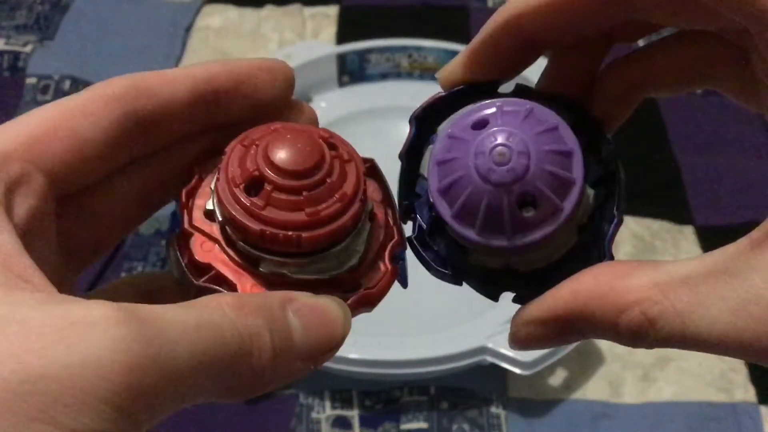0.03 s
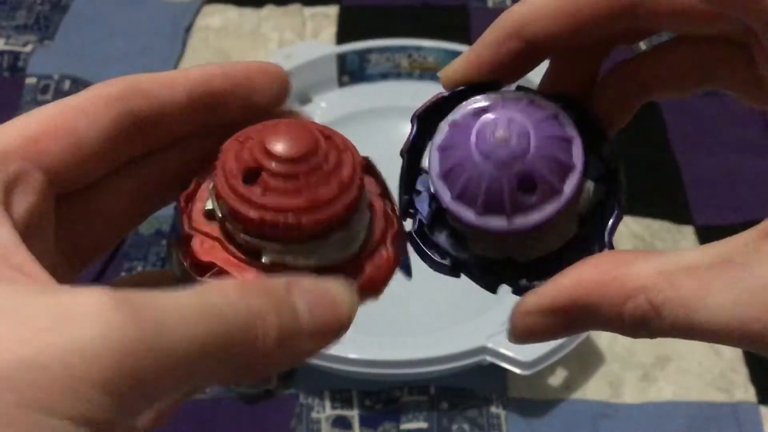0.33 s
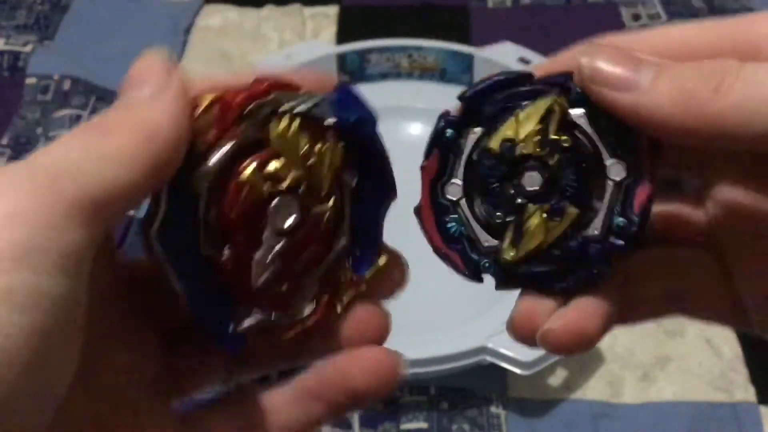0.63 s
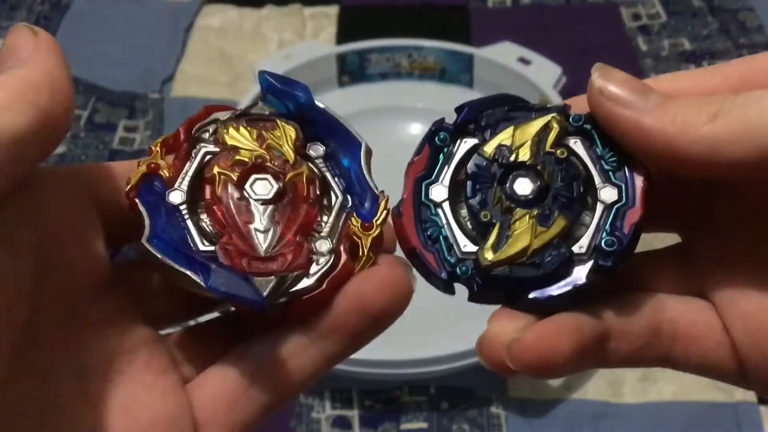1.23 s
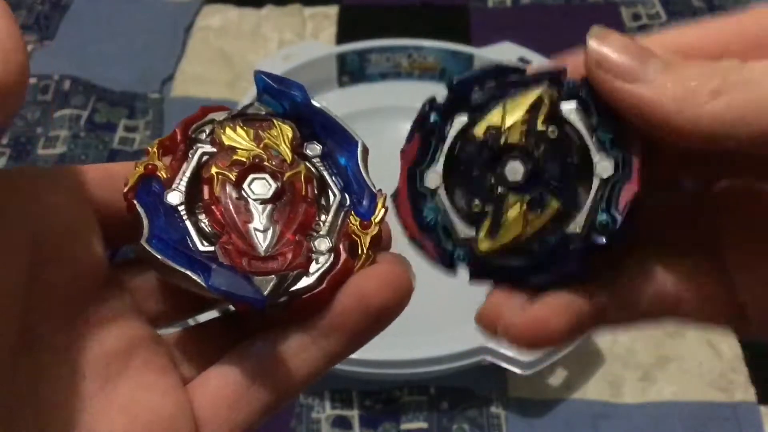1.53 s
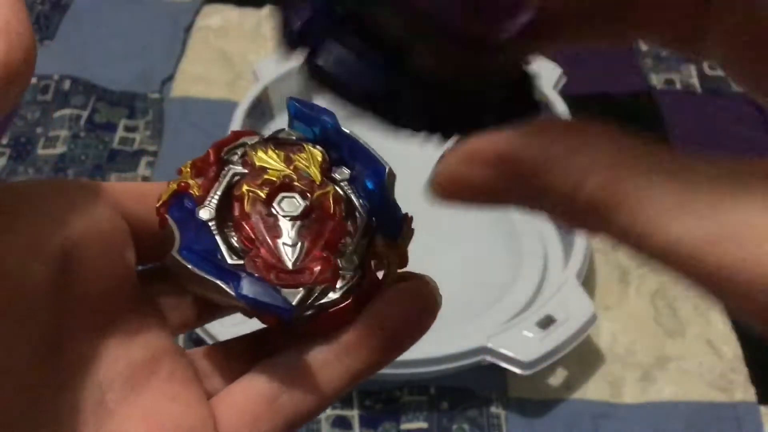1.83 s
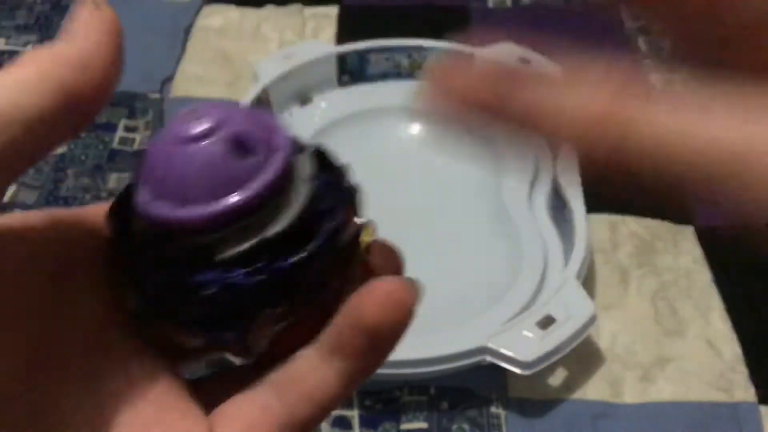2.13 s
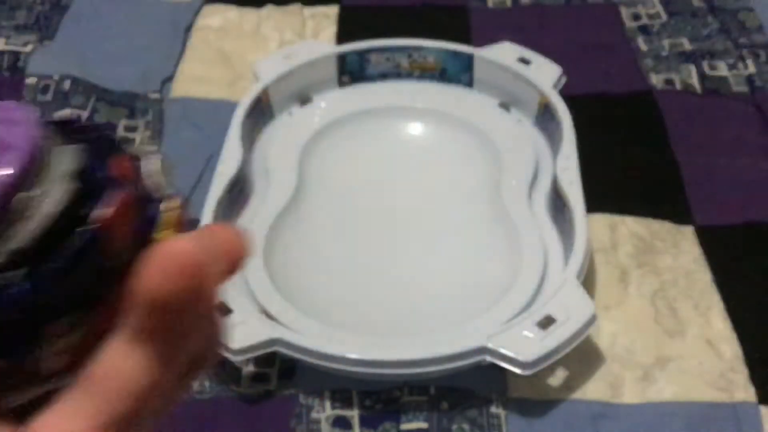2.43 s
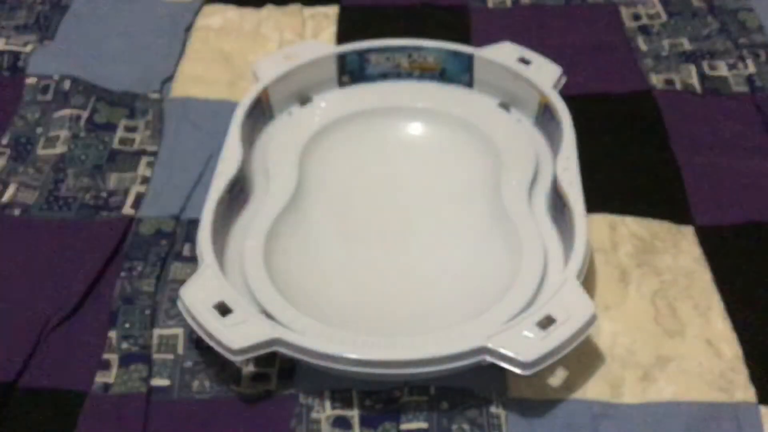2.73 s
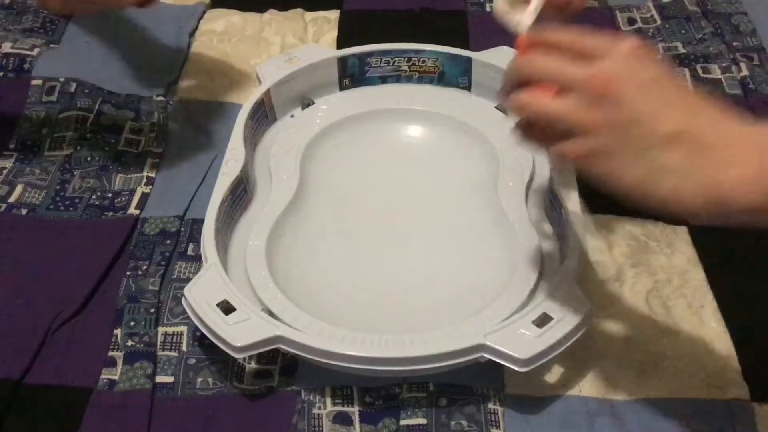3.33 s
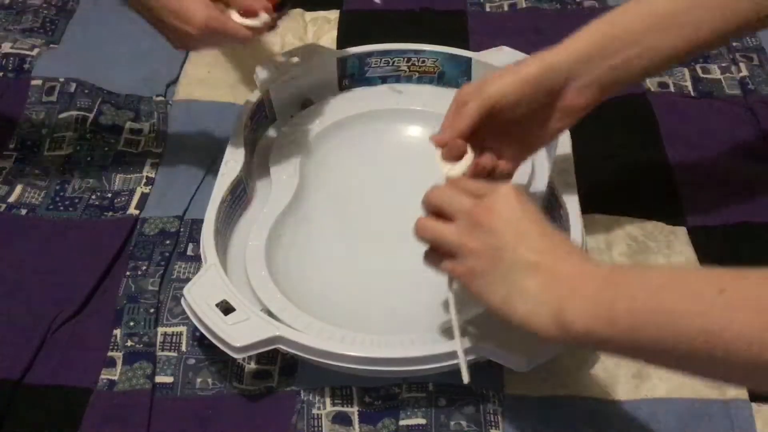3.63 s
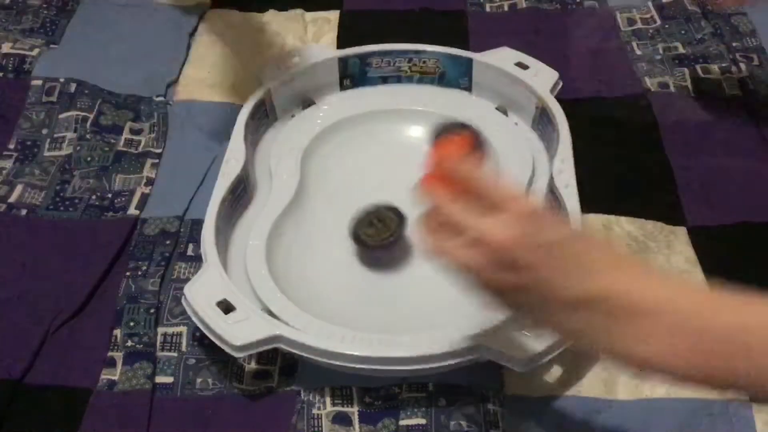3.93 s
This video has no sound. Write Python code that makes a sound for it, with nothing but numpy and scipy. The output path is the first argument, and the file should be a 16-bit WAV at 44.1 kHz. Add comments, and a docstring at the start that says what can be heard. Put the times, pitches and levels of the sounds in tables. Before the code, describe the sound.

A ratcheting ripcord zip launches a spinning top into a plastic arena, after light handling clicks.

```python
"""Light clicks come first, as two plastic and metal spinning tops are turned over in the hands.
The tops knock together once, and a metal disc inside gives a thin ring. A ripcord is pulled through
a launcher: a few slow ratchet teeth, then a fast zip that runs down. The hands jerk apart with dull
thumps, and a top lands in a hollow plastic arena. It all happens in a small furnished room."""
import sys
import numpy as np
from scipy import signal
from scipy.fft import rfft, irfft
from scipy.io import wavfile

SR = 44100
rng = np.random.default_rng(int(sys.argv[2]) if len(sys.argv) > 2 else 0)


def wav_out(sig):
    """Save sig, one row per channel (or a flat mono array), as 16-bit PCM at SR to the path in sys.argv[1]."""
    wavfile.write(sys.argv[1], SR, np.round(np.clip(np.atleast_2d(sig).T, -1, 1) * 32767).astype(np.int16))


N = 176400
T = np.arange(N) / SR


def from_db(db):
    """Turn decibels into a number to multiply by."""
    return 10 ** (np.asarray(db) / 20)


def colour(x, points, size=8192):
    """Shape the tone along (Hz, dB) points; white noise keeps its level."""
    hz, db = np.transpose(points)
    gain = from_db(np.interp(np.log(np.fft.rfftfreq(size, 1 / SR) + 1), np.log(hz), db))
    cepstrum = irfft(np.log(gain / np.sqrt(np.mean(gain ** 2))))
    # folding this in half keeps the filter from sounding before a hit
    cepstrum[1:size // 2] *= 2
    cepstrum[size // 2 + 1:] = 0
    response = irfft(np.exp(rfft(cepstrum)))[:size // 2]
    return signal.oaconvolve(x, response)[:N]


def butter(x, hz, kind):
    """Keep what is below ("low") or above ("high") a frequency."""
    return signal.sosfilt(signal.butter(2, hz, kind, fs=SR, output="sos"), x + 1e-18)


def resonate(x, hz, q):
    """Keep the sound near one pitch; a higher q is narrower."""
    return signal.lfilter(*signal.iirpeak(hz, max(q, 1), fs=SR), x + 1e-18)


def noise(points):
    """Steady noise of level 1 with the given tone."""
    return colour(rng.standard_normal(N), points)


def swell(s, width_s, db):
    """White noise that rises and falls around a moment."""
    return from_db(db) * np.exp(-((T - s) / width_s) ** 2) * rng.standard_normal(N)


def taps(rows):
    """One sharp push for each (seconds, dB) row."""
    out = np.zeros(N)
    for s, db in rows:
        out[int(np.clip(s, 0, T[-1]) * SR)] += from_db(db)
    return out


def contacts(rows, decay_s):
    """One crack of quickly dying noise for each (seconds, dB) row."""
    envelope = np.exp(-T[:SR // 5] / decay_s)
    out = np.zeros(N + len(envelope))
    for s, db in rows:
        start = int(np.clip(s, 0, T[-1]) * SR)
        out[start:start + len(envelope)] += from_db(db) * envelope * rng.standard_normal(len(envelope))
    return out[:N]


def ring(force, notes):
    """A pushed object rings at its own notes; each fades by 60 dB over its ring time."""
    out = 0
    for hz, db, ring_s in notes:
        fade, angle = np.exp(-np.log(1000) / (ring_s * SR)), 2 * np.pi * hz / SR
        feedback = [1, -2 * fade * np.cos(angle), fade * fade]
        out = out + from_db(db) * signal.lfilter([0, np.sin(angle)], feedback, force + 1e-18)
    return out


def tail(x, ring_s, build_s=0.0043):
    """Dense dying echoes with as much energy as the sound that starts them."""
    t = T[:SR // 2]
    response = rng.standard_normal(len(t)) * np.exp(-np.log(1000) * t / ring_s)
    response *= 1 - np.exp(-t / build_s)
    return signal.fftconvolve(x, response / np.sqrt(np.sum(response ** 2)))[:N]


# The tone of the air, rumble and hiss. Each row: frequency in Hz, level in dB.
AIR_COLOUR = [(28, -26.5), (45, -10.5), (68, 4), (95, -8), (250, -12.5), (450, -23.5), (650, -22),
              (900, -32.5), (2000, -36), (9000, -41.5), (16000, -48.5)]
RUMBLE_COLOUR = [(25, -28.5), (60, -10), (105, 6), (180, -14.5), (260, -5.5), (420, -36.5), (1000, -45),
                 (4000, -72.5)]
HISS_COLOUR = [(100, -8), (280, 6.5), (450, -2.5), (700, 4.5), (820, -7.5), (1200, -6.5), (1500, -15),
               (2800, -17), (6000, -36), (16000, -40)]
# How the rumble grows. Each row: time in seconds, level in dB.
RUMBLE_LEVEL = [(2.99, -84.5), (3.02, -52), (3.28, -57), (3.34, -50), (3.44, -49), (3.52, -43),
                (3.6, -49.5), (4.0, -38.5)]

def background(air_db=-64, hiss_db=-61.5, hiss_start_s=3.01):
    """Quiet room air; at about three seconds a dull hiss starts abruptly and a low rumble grows."""
    rumble = from_db(np.interp(T, *np.transpose(RUMBLE_LEVEL))) * noise(RUMBLE_COLOUR)
    hiss = from_db(hiss_db) * np.clip((T - hiss_start_s) / 0.011, 0, 1) * noise(HISS_COLOUR)
    return from_db(air_db) * noise(AIR_COLOUR) + rumble + hiss


# The tone of the room's echoes. Each row: frequency in Hz, level in dB.
ROOM_COLOUR = [(100, 0), (1000, 1), (4500, 1), (9000, -0.5), (16000, -1.5)]

def room(x, split_hz=8700):
    """The walls send back short echoes, low and high each with its own ring time."""
    low = tail(butter(x, split_hz, "low"), ring_s=0.19)
    high = tail(butter(x, split_hz, "high"), ring_s=0.22)
    return colour(low + high, ROOM_COLOUR)


def bump(start_s=2.902, start_hz=309.4, end_hz=47.4, sag_s=0.0088, attack_s=0.018, decay_s=0.027):
    """A soft bump on the microphone: a thud that falls in pitch, and a faint scuff."""
    age = np.maximum(T - start_s, 0)
    hz = end_hz + (start_hz - end_hz) * np.exp(-age / sag_s)
    envelope = np.exp(-age / decay_s) * (1 - np.exp(-age / attack_s))
    thud = np.sin(2 * np.pi * np.cumsum(hz * (age > 0)) / SR) * envelope
    scuff = colour(contacts([(2.9, -45.5)], decay_s=0.0042), HISS_COLOUR)
    return from_db(-28.5) * thud + scuff


# Clicks in the fingers. Each row: start in seconds, level in dB, extra treble in dB,
# extra bass in dB, pitch of the touched part in Hz.
CLICKS = [(.3158, -42.5, 2, 4, 5700), (.3335, -46.5, 2, 6, 5700), (.3456, -50, 4.5, 6, 1980),
          (.352, -50, -8, 3, 1920), (.3775, -53.5, -15, 8, 1950), (.3945, -51.5, 9, 3, 3040),
          (.419, -47.5, 10, 10, 5800), (.4666, -26.5, -9, -11, 4300), (.472, -29.5, 4, -12, 3560),
          (.514, -49, -6, -8, 1270), (.5253, -46.5, 1, 4, 2270), (.5691, -44.5, -11, 3, 1880),
          (.574, -48, -8, 6, 4830), (.61, -53, 5.5, 10.5, 1190), (.628, -57.5, -12, 3, 1900),
          (.7238, -45.5, 4, 5, 1710), (.731, -50.5, -9, 8, 1780), (.867, -45, -7, -8.5, 1900),
          (1.263, -62.5, -15, 14, 571), (1.642, -41.5, -2, 0, 1850), (1.6846, -51, -8, -2, 5200),
          (2.029, -40, -3, -2, 1850), (2.109, -59.5, 3, -3, 3440), (2.12, -56.5, -18, -7, 1880),
          (2.9, -58, -14, 8, 1010), (3.065, -52, -32, -2, 4400), (3.5902, -52.5, 13, -2, 5200)]
# The tone of the plastic. Each row: frequency in Hz, level in dB.
CLICK_COLOUR = [(100, -4.5), (420, -6), (580, 2.5), (790, -12.5), (980, -7), (1180, 1.5), (1500, -8.5),
                (1900, 3), (2900, -3), (4700, 2.5), (6500, -5), (9000, -9.5), (16000, -14)]
# Parts slide on fingers and cord. Each row: middle in seconds, half width in seconds, level in dB.
SLIDES = [(0.348, 0.03, -64), (.6, 0.07, -72.5), (2.056, 0.028, -66), (2.334, 0.036, -68),
          (3.605, 0.013, -54), (3.632, 0.0092, -48)]
# Faint notes of a held top. Each row: pitch in Hz, level in dB, ring time in seconds.
TOP_NOTES = [(596, -52, 0.062), (3560, -54, 0.0706), (4250, -57.5, 0.067)]
# Short rubs, low from a finger, high from plastic. Each row: middle in seconds,
# half width in seconds, pitch in Hz, narrowness (q), level in dB.
RUBS = [(.334, 0.0098, 109, 1.5, -33.5), (.483, 0.015, 3830, 2, -41.5), (3.06, 0.049, 4250, 2.7, -59.5)]
# Light touches on the metal rim. Each row: start in seconds, level in dB.
RIM_TOUCHES = [(.467, -66.5), (1.642, -59.5)]

def handling(low_hz=750, high_hz=5500, part_db=11.5, rim_hz=6880):
    """Fingers turn the tops: plastic clicks, slides and rubs, and each touched part has its own pitch."""
    cracks = [contacts([row[:2]], decay_s=0.0024) for row in CLICKS]
    parts = sum(resonate(crack, row[4], q=8) for crack, row in zip(cracks, CLICKS))
    edge = contacts([(s, db + treble) for s, db, treble, _, _ in CLICKS], decay_s=0.0005)
    body = contacts([(s, db + bass) for s, db, _, bass, _ in CLICKS], decay_s=0.004)
    middle = butter(sum(cracks), low_hz, "high") + sum(swell(*row) for row in SLIDES)
    bands = butter(body, low_hz, "low") + butter(middle, high_hz, "low") + butter(edge, high_hz, "high")
    rubs = sum(resonate(resonate(swell(s, width, db), hz, q), hz, q) for s, width, hz, q, db in RUBS)
    rim = ring(taps(RIM_TOUCHES), [(rim_hz, 0, 0.14)])
    return colour(bands, CLICK_COLOUR) + from_db(part_db) * parts + ring(middle, TOP_NOTES) + rubs + rim


# The tops hit each other. Each row: start in seconds, level in dB.
KNOCKS = [(1.9155, -46.5), (1.9218, -31.5), (1.9268, -16.5), (1.929, -15.5), (1.931, -19), (1.9395, -23.5)]
# The tone of the knock. Each row: frequency in Hz, level in dB.
KNOCK_COLOUR = [(100, -25), (260, -4.5), (450, -13.5), (610, -4.5), (800, -18), (1100, -1), (1500, -9),
                (1900, 4.5), (2300, -1), (4300, -3.5), (5000, 3.5), (5800, 4), (7000, -4.5), (11000, -6.5),
                (16000, -9)]
# The metal weight disc. Each row: pitch in Hz, level in dB, ring time in seconds, swell time in seconds.
DISC_NOTES = [(4495, -45.5, .3, .01), (5211, -48.5, .62, .01), (6202, -36.5, 0.66, .048),
              (7983, -27, .17, .02), (8952, -40.5, .16, .01), (11370, -40, .22, .01)]

def knock(disc_db=-12, silent_at_s=2.34, damping_s=0.19):
    """The tops clack together; the hardest touch rings a metal disc until a hand stills it."""
    hardest_s = max(KNOCKS, key=lambda row: row[1])[0]
    push = taps([(hardest_s, disc_db)])
    age = np.maximum(T - hardest_s, 0)
    disc = sum(ring(push, [(hz, db, ring_s)]) * np.minimum(age / swell_s, 1) ** 3
               for hz, db, ring_s, swell_s in DISC_NOTES)
    hand_fade = np.clip((silent_at_s - T) / damping_s, 0, 1)
    return colour(contacts(KNOCKS, decay_s=0.0028), KNOCK_COLOUR) + disc * hand_fade


# Thumps of the pull. Each row: start in seconds, level in dB, decay time in seconds.
THUMPS = [(3.635, -55, .013), (3.743, -25.5, 0.012), (3.8165, -16.5, 0.013), (3.8306, -15, 0.0082),
          (3.854, -24, 0.011), (3.867, -22.5, 0.0097), (3.89, -32.5, .04)]
# The tone of their rustle. Each row: frequency in Hz, level in dB.
THUMP_COLOUR = [(25, -27), (70, -4.5), (140, 5), (280, -3.5), (450, -8), (680, -15), (820, -30),
                (1200, -18), (1500, -47), (3000, -39), (9000, -73)]
# Their hollow notes. Each row: pitch in Hz, level in dB, ring time in seconds.
THUMP_NOTES = [(150, 1.5, 0.073), (207, 1, 0.042), (277, -3, 0.071), (416, -7.5, 0.046), (495, -10, 0.044)]

def thumps(rustle_db=2.5, padding_hz=530, low_cut_hz=91):
    """Low, padded blows as the hands jerk apart: a hollow ring and a dull rustle."""
    rustle = colour(sum(contacts([(s, db)], decay) for s, db, decay in THUMPS), THUMP_COLOUR)
    blows = butter(taps([(s, db) for s, db, _ in THUMPS]), padding_hz, "low")
    return butter(from_db(rustle_db) * rustle + ring(blows, THUMP_NOTES), low_cut_hz, "high")


# The hardest thump jolts the arena, then a top lands and skips. Each row: start in seconds, level in dB.
JOLTS = [(3.8305, -21)]
LANDINGS = [(3.9283, -21), (3.9319, -7), (3.9345, -10), (3.943, -22), (3.964, -19)]
# The tone of the bowl. Each row: frequency in Hz, level in dB.
ARENA_COLOUR = [(60, -30), (200, -9.5), (320, -2.5), (500, -3), (660, 3), (800, -5), (1050, -4.5),
                (1270, 2), (1550, -4), (1830, 0), (2300, -8), (3100, -9), (4500, -16), (7000, -26.5),
                (16000, -32)]
# The bowl's notes. Each row: pitch in Hz, level in dB, ring time in seconds.
ARENA_NOTES = [(148, -35, .4), (286, -37, .24), (608, -29, .34), (660, -26, .2), (709, -28, .36),
               (1200, -16, .16), (1375, -19, .26), (1437, -24, .25), (1745, -26, .27), (1787, -23, .28),
               (2767, -25, .12), (3117, -31, .25)]

def arena(blow_db=12, shell_db=-13):
    """The thin plastic bowl is jolted, then struck by a top, and rings hollowly."""
    force = contacts(JOLTS + LANDINGS, decay_s=0.0031)
    blow = taps([max(LANDINGS, key=lambda row: row[1])])  # sharp start of the hardest landing
    shell = from_db(shell_db) * tail(force, ring_s=0.46)
    return colour(force + from_db(blow_db) * blow + shell, ARENA_COLOUR) + ring(blow, ARENA_NOTES)


def gear_zip(start_s, teeth_per_s=185, slowing_per_s=1.5, hold_s=0.018):
    """The gear races and coasts down: 40 slightly uneven clicks that slow and fade."""
    timing, strength = rng.standard_normal((40, 2)).T
    age = np.cumsum(np.r_[0, 1 + 0.12 * timing[1:]]) / teeth_per_s
    age = age * (1 + slowing_per_s * age / 2)
    racing_db = -8 - 290 * np.maximum(age - hold_s, 0)
    coasting_db = -25.5 - 123 * age
    db = np.maximum(racing_db, coasting_db) - 0.4 * strength
    return contacts(zip(start_s + age, db), decay_s=0.0021)


# Slow ratchet teeth as the cord is taken up. Each row: start in seconds, level in dB.
SLOW_TEETH = [(3.6385, -24), (3.6405, -24), (3.6465, -30), (3.6603, -21), (3.6747, -17), (3.6893, -23),
              (3.703, -21), (3.712, -12), (3.7145, -15), (3.7235, -25), (3.729, -23), (3.7375, -19)]
# The tone of the launcher. Each row: frequency in Hz, level in dB.
LAUNCHER_COLOUR = [(100, -2.5), (330, -29), (650, -5.5), (860, -18.5), (1200, -12), (1600, -11), (2200, -6),
                   (2800, 9.5), (3550, -1), (4400, 3), (6800, 3.5), (8500, -2), (12000, -1), (16000, -6)]
# Notes of the launcher and its top. Each row: pitch in Hz, level in dB, ring time in seconds.
LAUNCHER_NOTES = [(2543, -46.5, 0.32), (2698, -66, 0.18), (2680, -53, 0.1), (2900, -36.5, 0.1),
                  (3151, -41, 0.19), (4208, -36.5, 0.19), (4580, -66, 0.18), (5520, -45, .45),
                  (5700, -39, 0.24), (5970, -44, .2), (6491, -58, 0.2), (7000, -52, .15), (7900, -49, 0.18),
                  (8058, -55, .2)]

def launcher(zip_start_s=3.7394, rub_db=-36.5, ring_db=-7.5):
    """The cord rubs and lifts a small catch tooth by tooth; the catch sings as the gear spins up."""
    fast_teeth = gear_zip(zip_start_s)
    taking_up = (T > SLOW_TEETH[0][0]) & (T < zip_start_s)
    rub = from_db(rub_db) * rng.standard_normal(N) * taking_up
    force = contacts(SLOW_TEETH, decay_s=0.0024) + rub + fast_teeth
    sing = resonate(swell(s=3.745, width_s=0.0061, db=5.5), hz=6886, q=38)
    return sing + colour(force, LAUNCHER_COLOUR) + ring(force * from_db(ring_db), LAUNCHER_NOTES)


def scene(near_echo_db=-18, far_echo_db=-7):
    """The handling is close by; the launch is farther off, so it has more echo."""
    near = handling() + knock()
    far = launcher() + arena()
    echoes = room(from_db(near_echo_db) * near + from_db(far_echo_db) * far)
    return (near + far + echoes + thumps() + bump() + background())[None]


def record(dry, low_cut_hz=36, high_cut_hz=16100):
    """Cut the deepest bass, stop peaks at full scale, then cut the highest treble."""
    clipped = np.clip(butter(dry, low_cut_hz, "high"), -1, 1)
    return signal.sosfilt(signal.ellip(12, .1, 80, high_cut_hz, fs=SR, output="sos"), clipped)


dry = scene()
out = record(dry)
wav_out(out)
```